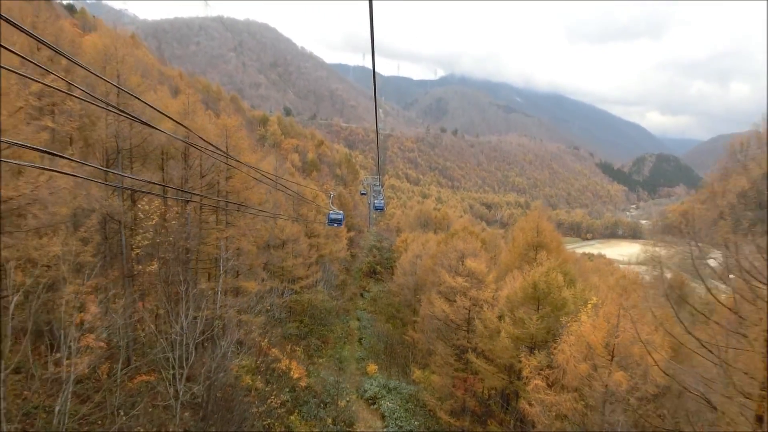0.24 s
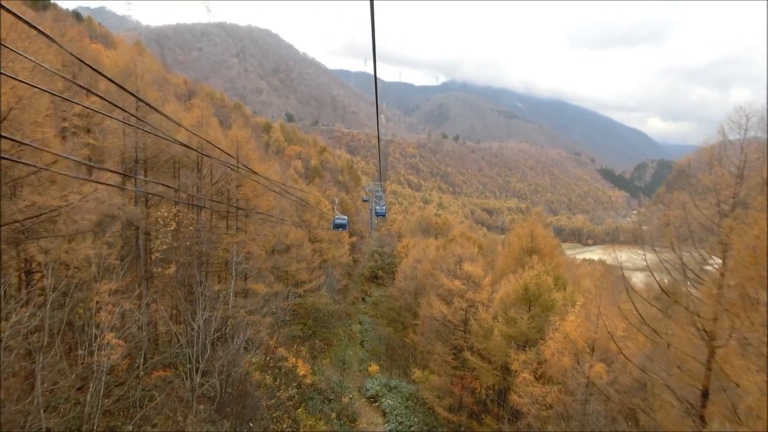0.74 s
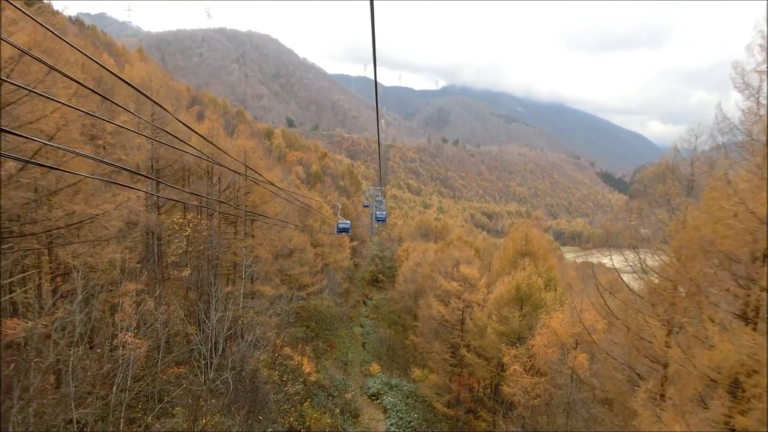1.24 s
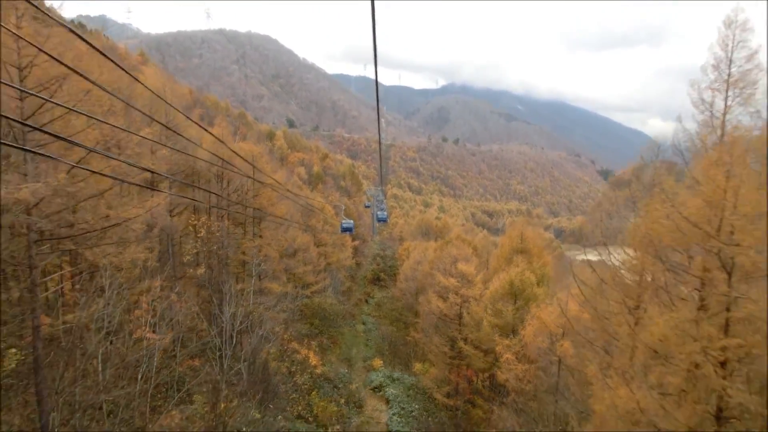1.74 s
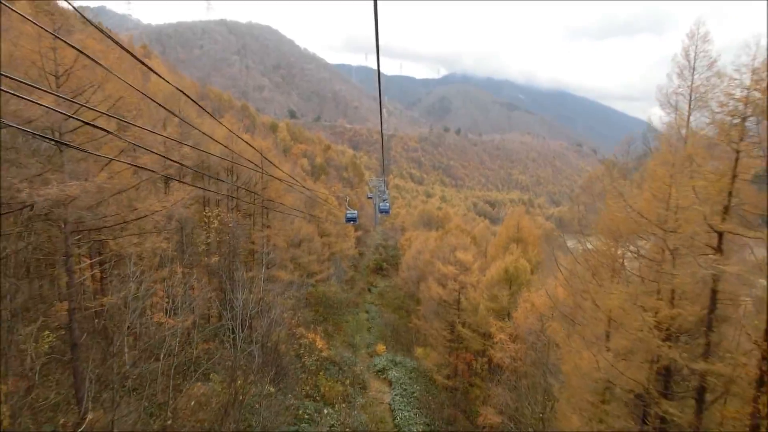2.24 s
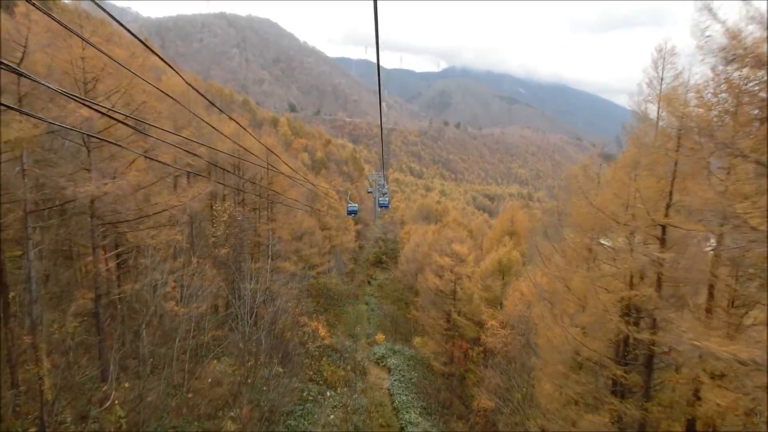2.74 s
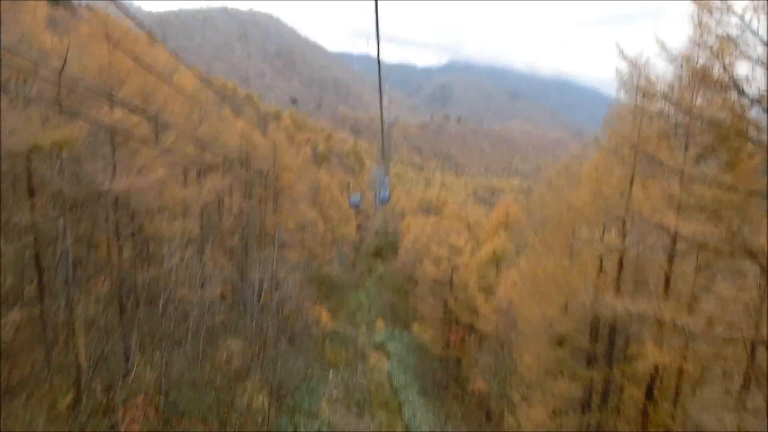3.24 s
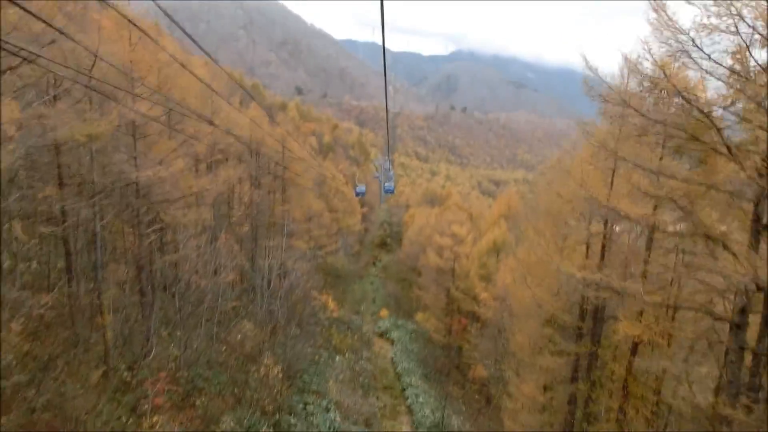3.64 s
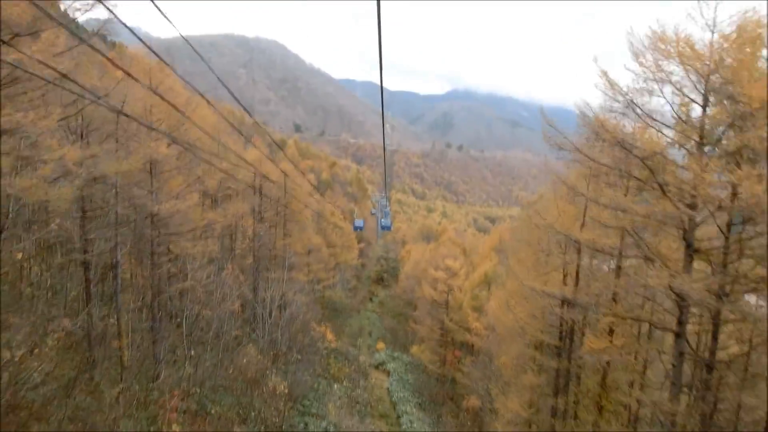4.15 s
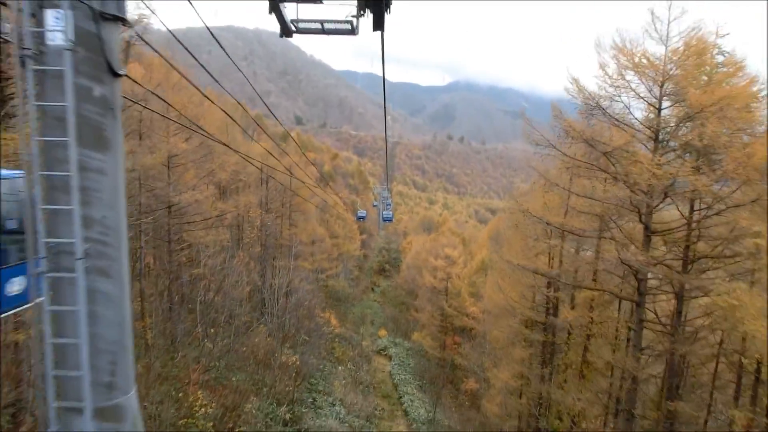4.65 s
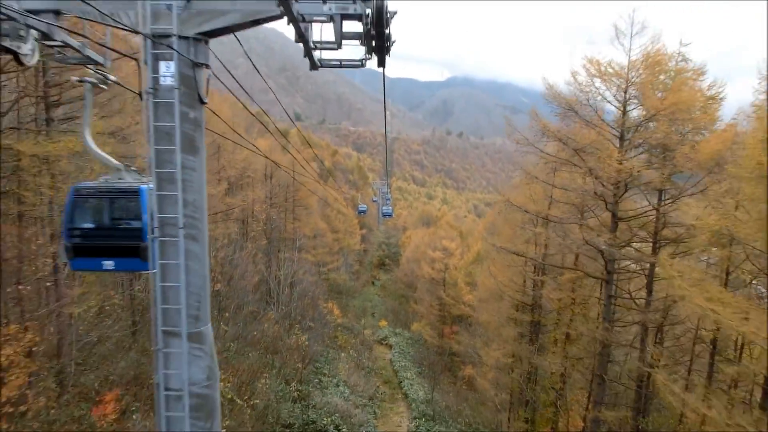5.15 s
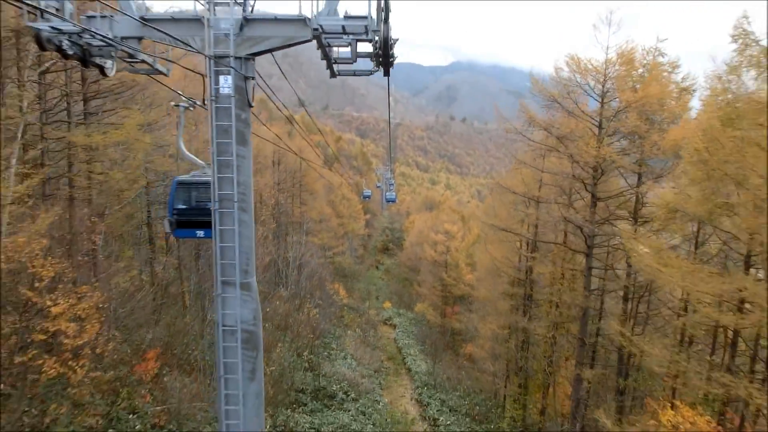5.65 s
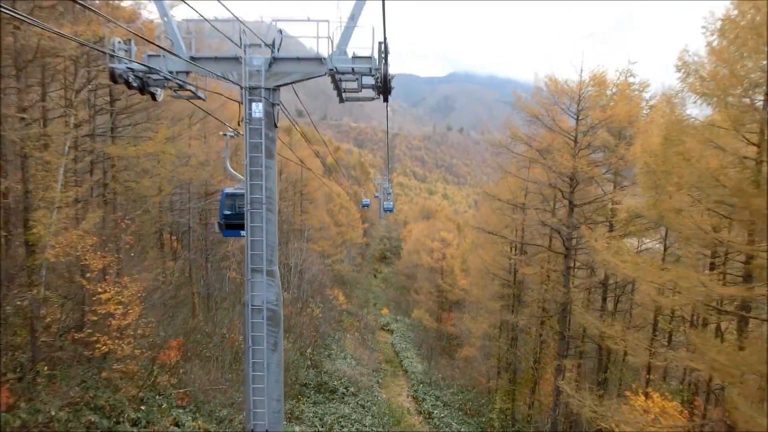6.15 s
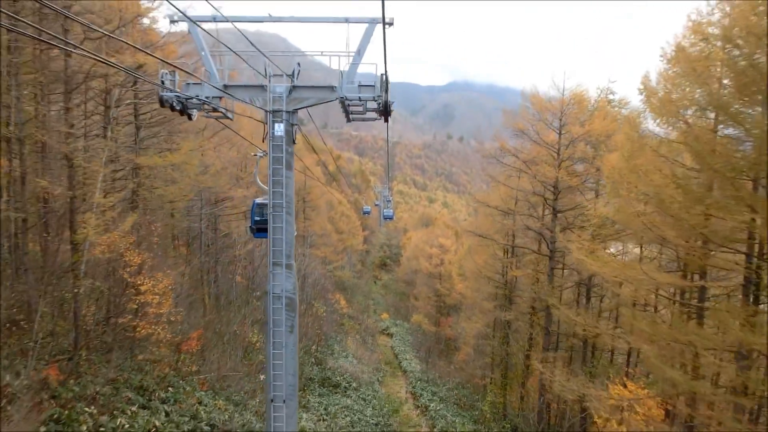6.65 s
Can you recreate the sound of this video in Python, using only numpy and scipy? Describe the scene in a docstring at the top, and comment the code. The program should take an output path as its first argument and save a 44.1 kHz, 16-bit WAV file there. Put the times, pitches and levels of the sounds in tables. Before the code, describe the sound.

Inside a gondola cabin above autumn woods, a soft low hum pulses several times a second under faint airflow. After about three seconds the cabin hits a tower's wheels: deep booming jolts, rough rattling and sharp metallic clacks overhead. A second, lighter and brighter run of clacks follows, then it eases to humming with slightly stronger air. Close stereo microphone within the cabin.

```python
"""Inside a moving gondola cabin: the haul rope's strands hum through the grip into the shell, as wavering tones.
At a tower the grip bumps over the sheave wheels: jolts swell the cabin's boom and frame rumble, and trains of
knocks and single bursts make loose metal rattle and clack overhead, while a bracket sings in fuzzy tones.
Behind them lie a soft rush of air in shaped noise, cloth brushing in grainy hiss, and a few small ticks."""
import sys
import numpy as np
from scipy import signal
from scipy.fft import rfft, irfft, next_fast_len
from scipy.io import wavfile
from scipy.ndimage import uniform_filter1d

SR = 44100
rng = np.random.default_rng(int(sys.argv[2]) if len(sys.argv) > 2 else 0)


def inscribe(sig):
    """Save sig as 16-bit PCM at rate SR to the path in sys.argv[1].

    A 1-D sig is mono; a 2-D sig holds one channel per row.
    Samples are clipped to [-1, 1] before scaling.
    """
    pcm = np.round(np.clip(np.atleast_2d(sig).T, -1, 1) * 32767)
    wavfile.write(sys.argv[1], SR, pcm.astype(np.int16))


def volts(x):
    """Linear amplitude factor 10**(x/20) for a level x in dB, scalar or array-like."""
    e = np.asarray(x, float) / 20
    return 10 ** e


N = 304012  # samples

# strands of the rope running over the wheels: t/s, strand rate f/Hz
STRAND_RATE = [(0, 82.36), (.8, 83.1), (1.5, 85.1), (2.1, 87.6), (2.9, 89.14), (3.6, 88.25), (4.4, 86.13),
               (5.2, 85.38), (6.0, 83.6), (6.89, 83.37)]
# the rope's lowest line: t/s, f/Hz, level/dB before the throb, throb depth (0-1)
HUM = [(0, 83.9, -32, 0.7), (.4, 84.7, -38.5, 0), (.65, 85.6, -34, 0), (.86, 83, -37.5, 0.3),
       (1.05, 83.5, -30.5, 0.56), (1.25, 87.1, -34.5, 0), (1.45, 85.93, -30.5, 0.64),
       (1.7, 90.1, -31, 0.01), (2.05, 91.57, -28, 0.6), (2.35, 92.37, -31.5, 0.29), (2.75, 91.5, -30, 0.63),
       (3.0, 92.7, -28.5, 0.6), (3.2, 91.5, -21, 0.3), (3.4, 83.85, -34, 0.9), (3.7, 88.16, -19.5, 0.3),
       (4.3, 88.6, -38, 0), (4.37, 85.9, -24, 0), (4.66, 85.2, -26, 0), (4.74, 84.7, -33, 0.6),
       (4.9, 84.4, -32, 0.89), (5.07, 85.4, -28.5, 0.37), (5.3, 85.15, -34, 0.6), (5.46, 86.2, -26.5, 0.61),
       (5.64, 86.05, -29, 0.5), (5.78, 85.24, -29.5, 0.55), (5.88, 83.7, -31.5, 0.52),
       (6.1, 82.6, -36.5, 0.6), (6.5, 83.25, -32.5, 0.5), (6.89, 82.6, -36.5, 0.5)]
# the drone throbs about 4.7 times a second: crest t/s, crest number
THROB_CRESTS = [(-.1, -1), (2.97, 13), (4.83, 22), (6.94, 32)]
# higher lines of the rope: name, multiple of the strand rate, wavering width f/Hz,
# level/dB against the hum, level/dB against the jolts
OVERTONES = [("third half", 1.5, 10, -32, -33), ("seventh half", 3.45, 10.6, -35, -29),
             ("second", 2.07, 9.4, -14.5, -11.5), ("third", 3, 7, -19.5, -20),
             ("fourth", 3.98, 8, -23.5, -24), ("fifth", 5, 24, -27.5, -23)]
# an overtone or the door swells for a while: name, middle t/s, length t/s, level/dB
SWELLS = [("fourth", 0.13, 0.53, -46.5), ("fourth", 0.94, 0.092, -46), ("third", 0.73, 1, -50.5),
          ("second", 0.9, 0.33, -45), ("third", 1.63, 0.14, -42), ("fourth", 1.71, 0.19, -45.5),
          ("second", 1.833, 0.52, -39), ("third", 2.45, 1.2, -41.5), ("fourth", 2.68, 0.29, -47.5),
          ("third", 3.51, 0.11, -25), ("third", 3.09, 0.058, -27), ("seventh half", 2.97, 0.08, -40),
          ("seventh half", 1.74, 0.96, -50), ("third half", 2.1, 0.71, -44),
          ("third half", 2.79, 0.19, -41), ("third half", 5.55, 0.3, -39.5), ("third half", 3.5, 0.1, -36),
          ("door", 4.9, 0.16, -40), ("fourth", 6.5, 0.093, -48), ("fourth", 5.9, 0.15, -53),
          ("door", 5.17, 0.21, -37.5), ("door", 5.37, 0.14, -40.5), ("door", 5.55, 0.086, -51),
          ("door", 5.78, 0.12, -40), ("fourth", 4.97, 0.21, -46), ("fourth", 5.2, 0.1, -42),
          ("fourth", 6.5, 0.2, -52), ("fourth", 6.15, 0.51, -47), ("third", 6.48, 0.21, -40.5)]
# jolts through the hanger: t/s, level/dB, sway level/dB against it, panel level/dB against it
JOLTS = [(0, -46.5, 13, -15), (2.15, -41.5, 2, 3), (2.93, -39, -22, 5), (3.06, -21, 1.5, -9),
         (3.16, -18, -17, -14), (3.27, -22, -5, -25), (3.4, -20, -5, -9), (3.52, -17.5, 1.5, -5.5),
         (3.63, -19, -2, -4.5), (3.74, -19.5, -11, -9), (3.83, -21.5, -2.5, -11), (3.94, -30, 2, -5.5),
         (4.1, -28.5, 0, -14), (4.23, -32, -8, -6), (4.35, -37, 0, -8), (4.53, -27.5, -14, -8.5),
         (5.07, -30, -3, -20), (5.27, -35.5, -4, -17), (5.43, -36, 4, 5), (5.52, -33, 2, -24),
         (5.64, -37, -11, -22), (5.95, -39.5, 8, -13), (6.2, -35.5, 3, -12), (6.42, -40, 10, -13),
         (6.72, -40.5, 4, -5)]
# rumble of the cabin frame: f/Hz, level/dB
FRAME_SPECTRUM = [(20, 0), (32, 3), (45, -8), (62, -5.5), (85, 4.5), (117, 3), (160, -0.5), (207, -4.5),
                  (290, -6), (380, -17.5), (550, -26), (900, -29), (1300, -52)]
# bouts of rattling at the wheels: start t/s, length t/s, heavy hanger level/dB, light fittings level/dB
RATTLE_BOUTS = [(2.934, 0.027, -57, -60), (3.058, 0.18, -30, -44), (3.144, 0.036, -27.5, -41),
                (3.223, 0.13, -30.5, -45), (3.419, 0.16, -27, -40), (3.533, 0.045, -22.5, -37.5),
                (3.65, 0.098, -28, -42), (3.807, 0.061, -42, -45), (3.86, 0.1, -34, -56),
                (4.084, 0.11, -28, -42), (4.203, 0.089, -43, -36), (4.343, 0.043, -34, -43),
                (4.43, 0.16, -38.5, -39), (4.603, 0.046, -36, -35.5), (4.729, 0.066, -40, -45.5),
                (4.847, 0.24, -48.5, -52), (5.292, 0.18, -46.5, -54)]
# rattle of the heavy hanger: f/Hz, level/dB
HANGER_SPECTRUM = [(250, 10), (400, 3.5), (700, 4), (1100, -0.5), (1350, -7.5), (1600, -3), (2200, -9.5),
                   (2600, -23), (4700, -38.5), (10800, -46), (15500, -51)]
# rattle of the light fittings: f/Hz, level/dB
FITTINGS_SPECTRUM = [(350, -33), (700, -34), (1000, 5.5), (1400, -6), (2000, -0.5), (3000, -3), (4600, -5),
                     (7000, -10), (10700, -23.5), (13000, -30), (15500, -42)]
# what the fittings ring with: f/Hz, width f/Hz, level/dB
FITTINGS_MODES = [(500.4, 16, 0.5), (695, 110, -33), (852, 11, -6), (930, 140, -2.5), (1130, 370, -10),
                  (1654, 47, -9), (1974, 22, -6), (2190, 190, -7), (2560, 130, -18), (2830, 120, -19),
                  (3060, 26, -19), (3910, 110, -32), (4400, 480, -10), (4900, 860, -8), (5900, 90, -14),
                  (7000, 400, -16), (11000, 2500, -7.5)]
# single clacks of metal: t/s, level/dB, strongest ring f/Hz, treble level/dB, length scale t/s
CLACKS = [(3.026, -21, 3830, -10, 0.0029), (3.0583, -21, 3310, -45, 0.0046),
          (3.061, -24, 2085, -35, 0.0071), (3.09, -35, 4800, 9, 0.0078), (3.102, -40, 990, -30, 0.0078),
          (3.117, -38, 698, -30, 0.0087), (3.155, -27, 4600, 2, 0.012), (3.1783, -13, 2400, -10, 0.0021),
          (3.181, -15, 805, -22, 0.0064), (3.1967, -15.5, 4600, 2, 0.0015), (3.217, -16, 6800, -3, 0.0012),
          (3.236, -25, 4900, 3, 0.0078), (3.239, -18, 672, -37, 0.0053), (3.24, -31, 2020, -27, 0.015),
          (3.248, -29, 950, -32, 0.005), (3.256, -28, 1650, -30, 0.0059), (3.2899, -26, 4680, 9, 0.01),
          (3.303, -28, 1600, -30, .007), (3.348, -29, 4760, -5, 0.0061), (3.392, -22.5, 1003, -36, 0.0058),
          (3.421, -20.5, 1820, -7, 0.0041), (3.443, -23.5, 2115, -9, 0.02), (3.446, -25, 700, -30, 0.014),
          (3.498, -28, 2050, -30, 0.015), (3.489, -29.5, 4900, 17, 0.028), (3.527, -29, 5900, 3, 0.0091),
          (3.562, -27.5, 3298, -9, 0.0044), (3.578, -22, 4370, -20, 0.006),
          (3.579, -14.5, 1410, -26, 0.0046), (3.593, -13.5, 1524, -35, 0.0057),
          (3.618, -38, 722, -35.5, 0.0068), (3.738, -20.5, 1400, -42, 0.0051),
          (3.745, -38, 950, -40, 0.0071), (3.791, -25.5, 1630, -40, 0.013), (3.805, -29.5, 2150, -30, .02),
          (3.8521, -28, 1700, -22, 0.008), (3.955, -30, 650, -30, 0.005), (4.106, -33, 910, -32, 0.0095),
          (4.126, -27, 490, -28, 0.0085), (4.147, -19.5, 833, -16, 0.012), (4.155, -25.5, 1950, -4, 0.04),
          (4.191, -22, 1950, -18, 0.014), (4.229, -15, 4285, -5, 0.0045), (4.233, -14, 2930, -9, 0.0061),
          (4.2449, -12.5, 1690, -14, 0.0048), (4.247, -15, 3860, -15, .004), (4.254, -19, 980, -6, 0.0079),
          (4.292, -28, 930, -30, 0.012), (4.294, -21.5, 1990, 0, 0.016), (4.346, -23.5, 493.6, -30, 0.0082),
          (4.37, -25, 497, -30, 0.018), (4.361, -22, 1940, 1, 0.022), (4.4115, -23, 1880, -3, 0.013),
          (4.4383, -19, 2560, -20, 0.015), (4.499, -28.5, 910, -10, 0.032), (4.552, -23.5, 2773, -8, 0.018),
          (4.612, -23.5, 2160, 0, 0.0096), (4.635, -22, 5824, 4, 0.011), (4.642, -27, 930, -30, 0.0094),
          (4.687, -34, 1900, 14, 0.012), (4.733, -28.5, 2560, -22, 0.011), (4.745, -29, 965, -25, 0.012),
          (4.765, -29, 800, -27, 0.012), (4.809, -38, 2300, -36, 0.015), (5.029, -34.5, 1028, -30, 0.014),
          (5.086, -36, 1104, -30, .01), (5.3, -35, 800, -16, .01), (5.435, -40, 799, -20, 0.01),
          (5.45, -35, 1020, -30, 0.0084)]
# a bracket sings while the second set of wheels shakes it: start t/s, length t/s, level/dB
BRACKET_BOUTS = [(4.12, .15, -38), (4.35, 0.072, -34.5), (4.44, 0.12, -36.5), (4.62, 0.028, -34),
                 (4.73, .04, -44)]
# tones of the bracket: f/Hz, width f/Hz, level/dB
BRACKET_TONES = [(500, 50, -8), (760, 70, -12), (930, 55, 0), (1150, 80, -12), (1700, 50, -13),
                 (1925, 55, -5), (2170, 60, -11), (2570, 55, -10), (2860, 50, -13)]
# rush of air: f/Hz, level/dB
AIR_SPECTRUM = [(200, -24), (330, -8), (430, -17), (560, -15.5), (900, -15), (1300, -20), (1800, -19.5),
                (2300, -21.5), (4500, -26.5), (6000, -28), (7500, -28), (10000, -29.5), (13000, -33.5),
                (15500, -31.5)]
# course of the rush: t/s, level/dB
AIR_LEVEL = [(0, -50.5), (1.8, -50.5), (2.6, -48.5), (3.3, -42), (4.6, -42.5), (5.1, -45.5), (5.9, -46),
             (6.89, -46)]
# broad band of wind at a window gap: t/s, level/dB
GAP_LEVEL = [(0, -65.5), (2.3, -67.5), (2.9, -59.5), (4.8, -67), (5.8, -68), (6.4, -57), (6.89, -61)]
# cloth brushing near the microphone: start t/s, end t/s, level/dB
CLOTH_STROKES = [(0.68, 1.099, -51), (2.147, 2.449, -58.5), (6.172, 6.379, -53)]
# hiss of the cloth: f/Hz, level/dB
CLOTH_SPECTRUM = [(2500, -43), (4500, -6.5), (7000, -11), (10500, -6), (13000, -9), (15500, -10.5)]
# small ticks in the cabin: t/s, level/dB, f/Hz
TICKS = [(.56, -49, 4000), (1.245, -46, 11800), (1.504, -51, 8970)]
# stereo image, likeness of left and right: f/Hz, likeness (0-1)
LIKENESS = [(60, 0.96), (640, 0.97), (1400, 1), (3100, 0.92), (5000, 0.78), (7000, 0.65), (10000, 0.37),
            (15000, 0.18)]
# stereo image, lead of left over right in what they share: f/Hz, phase/rad
LEFT_LEAD = [(60, 0), (5000, 0), (7500, .2), (10000, 1.0), (13000, 2.4), (15500, 2.6)]
# stereo image, left over right: f/Hz, level/dB
LEFT_OVER_RIGHT = [(60, 2.5), (500, 2), (1200, 2.5), (2500, 1), (5000, 2), (9000, 2), (12000, 2),
                   (15000, -1)]

FRAME_RING_S = 0.13  # time constant of the frame's dying away
BOUT_RISE_S = 0.027


def rope():
    """The lowest line drones and throbs, pulled about by the shell; higher multiples are thinner wavering lines."""
    strand_hz = columns(STRAND_RATE)[0]
    drone_hz, hum_db, depth = columns(HUM)
    throb = 1 + depth * np.cos(2 * np.pi * columns(THROB_CRESTS)[0])
    out = volts(hum_db) * throb * wavering(drone_hz, 8, steady=0.6)
    shaken = jolts(FRAME_RING_S, np.transpose(JOLTS)[1])
    for name, multiple, width, rest_db, jolt_db in OVERTONES:
        size = pooled(volts(hum_db + rest_db), volts(jolt_db) * shaken, swells(name))
        out = out + size * wavering(multiple * strand_hz, width, steady=0.58)
    # a door panel that the hum sets going now and then
    return out + swells("door") * wavering(265, 10.4, steady=0.39)


def swells(name):
    """Bell-shaped swells of one line, added by power."""
    t = np.arange(N) / SR
    return pooled(*(volts(db) * np.exp(-(2 * (t - middle) / length) ** 2)
                    for line, middle, length, db in SWELLS if line == name))


def cabin():
    """The cabin sways, its shell booms, a panel drums and the frame rumbles with the hum and the jolts."""
    hum_db = columns(HUM)[1]
    _, jolt_db, sway_db, panel_db = np.transpose(JOLTS)
    # levels in dB: the sway's own at rest, the others against the hum; first jolts() setting is ring time in s
    sway = pooled(volts(-40.5), jolts(0.14, jolt_db + sway_db))
    boom = pooled(volts(hum_db - 16.5), jolts(0.13, jolt_db))
    panel = pooled(volts(hum_db - 23.5), jolts(0.14, jolt_db + panel_db))
    frame = pooled(volts(hum_db - 7), jolts(FRAME_RING_S, jolt_db - 2))
    modes = sway * wavering(43, 18, steady=0.82)
    modes = modes + boom * wavering(120, 27, steady=0.46)
    modes = modes + panel * wavering(210, 20.4, steady=0.28)
    surges = volts(2.5 * drift(N, 3000))  # the rumble comes in uneven surges
    return modes + frame * coloured(surges * rng.standard_normal(N), FRAME_SPECTRUM)


def rattle():
    """Knocks set the metal ringing: coarse ones the hanger, dense ones the fittings."""
    start, length, hanger_db, fittings_db = np.transpose(RATTLE_BOUTS)
    coarse = gusts(150, fade_s=0.008, floor=0.8) * rng.standard_normal((2, N))
    dense = gusts(350, fade_s=0.005, floor=0.5) * rng.standard_normal((2, N))
    hanger = coloured(coarse, HANGER_SPECTRUM)
    light = evened(coloured(dense, FITTINGS_SPECTRUM) + volts(-3) * evened(fittings(dense)))
    hanger_size = bouts(zip(start, length, hanger_db), fade=0.092)
    light_size = bouts(zip(start, length, fittings_db), fade=0.083)
    return hanger_size * hanger + light_size * light


def clacks():
    """Each clack is a sudden burst: a broad crack and one strong ring of its own; the fittings ring after it."""
    size = 4096
    out, blows = np.zeros((2, N)), np.zeros((2, N))
    t = np.arange(size) / SR
    f = np.fft.rfftfreq(size, 1 / SR)
    for s, db, hz, treble_db, length in CLACKS:
        tilt = [(400, -13), (1200, -14), (2500, -12.5 + 0.23 * treble_db), (4200, -11.5 + 0.37 * treble_db),
                (6500, -11.5 + treble_db), (11000, -14 + treble_db), (13000, -16 + treble_db),
                (15500, -35 + treble_db)]  # f/Hz, level/dB
        noise = rng.standard_normal((2, size))
        attack = np.minimum(t / (0.13 * length), 1)
        decay = np.exp(-(t / (1.49 * length)) ** 2) + 0.1 * np.exp(-t / 0.1)
        first_contact = volts(db - 9) * np.exp(-t / 0.001)
        shape = volts(db - 10.5) * attack * decay + first_contact
        crack = evened(evened(irfft(rfft(noise) * volts(read(tilt, f)))) * shape)

        wobble = 0.03 * drift((2, size), 150, axis=-1)  # as a share of the ring's pitch
        cycles = np.cumsum(hz * (1 + wobble), axis=1) / SR + rng.random((2, 1))
        ring = evened(np.sin(2 * np.pi * cycles) * shape)
        burst = crack + volts(-4 - 0.2 * treble_db) * ring  # dull clacks ring purer
        burst *= np.linalg.norm(shape) / np.linalg.norm(burst, axis=1, keepdims=True)
        first = round(s * SR)
        out[:, first:first + size] += burst
        # the shortest clacks hardly move the metal
        blows[:, first:first + size] += noise * shape * min(length / 0.021, 1)
    return out + volts(-9) * fittings(blows)


def fittings(drive):
    """The loose metal rings on at its modes; the struck spot wanders, so each mode comes and goes."""
    spots = drift((N // 256 + 1, len(FITTINGS_MODES)), 7, axis=0)
    spots = volts(2 * np.repeat(spots, 256, axis=0)[:N].T)
    out = 0
    for (hz, width, db), spot in zip(FITTINGS_MODES, spots):
        evening = np.sqrt(SR / width / 3)  # makes up for narrow modes passing less noise
        out = out + volts(db) * resonate(drive * spot, hz, width) * evening
    return out


def bracket():
    """Fuzzy metal tones, each coming and going by itself, broken up by uneven shaking."""
    uneven = volts(3 * drift(N, 500))
    tones = 0
    for hz, width, db in BRACKET_TONES:
        tones = tones + volts(db) * volts(3 * drift(N, 500)) * wavering(hz, width, steady=0.25)
    return bouts(BRACKET_BOUTS, fade=0.037) * evened(uneven * tones)


def air():
    """Smooth noise rushes past the cabin in faint drifting patches, with wind at a window gap and a faint whine."""
    noise = rng.standard_normal((3, 2, N))
    rush = volts(columns(AIR_LEVEL)[0]) * coloured(noise[0], AIR_SPECTRUM)
    gap = volts(columns(GAP_LEVEL)[0]) * evened(resonate(noise[1], 7340, 1700))
    whine = volts(-66.5) * evened(resonate(noise[2], 1660, 110))  # faint band that sings in the rush
    _, t, z = signal.stft(rush + gap + whine, nperseg=512)
    patches = uniform_filter1d(rng.standard_normal(z.shape[1:]), 8, axis=0)  # across frequency
    patches = evened(uniform_filter1d(patches, 10, axis=1))  # along time
    flicker = drift(len(t), 6)  # the whole rush together
    return signal.istft(z * volts(patches + 0.15 * flicker), nperseg=512)[1][:, :N]


def cloth():
    """Grainy, uneven high hiss under each stroke of cloth, and a few short ticks as decaying sines."""
    t = np.arange(N) / SR
    grain = volts(1.3 * drift(N, 120) + 1.3 * drift(N, 1500))  # fine and coarse unevenness
    hiss = coloured(grain * rng.standard_normal((2, N)), CLOTH_SPECTRUM)
    strokes, ticks = np.zeros(N), np.zeros(N)
    for start, end, db in CLOTH_STROKES:
        strokes += volts(db) * np.clip(np.minimum((t - start) / 0.042, (end - t) / 0.088), 0, 1)
    for s, db, hz in TICKS:
        decay = (t > s) * np.exp(-abs(t - s) / 0.004)
        ticks += volts(db) * np.sin(2 * np.pi * hz * (t - s)) * decay
    return strokes * hiss + ticks


def evened(x):
    """Scales to rms 1."""
    return x / np.sqrt(np.mean(x ** 2) + 1e-20)


def drift(shape, span, axis=-1):
    """Slow random drift at rms 1: noise averaged over span points."""
    return evened(uniform_filter1d(rng.standard_normal(shape), span, axis=axis))


def read(points, hz):
    """Reads a spectrum on a log-frequency axis."""
    f, value = np.transpose(points)
    return np.interp(np.log(hz + 1), np.log(f + 1), value)


def columns(rows):
    """Every column of a curve table at every sample."""
    s, *values = np.transpose(rows)
    return [np.interp(np.arange(N) / SR, s, v) for v in values]


def coloured(x, spectrum):
    """Filters x by a spectrum in dB, at rms 1."""
    size = next_fast_len(N)
    gain = volts(read(spectrum, np.fft.rfftfreq(size, 1 / SR)))
    return evened(irfft(rfft(x, size) * gain, size)[..., :N])


def resonate(x, hz, width):
    """Shifts hz to zero, smooths twice, shifts back: a steep resonance."""
    turn = np.exp(2j * np.pi * np.cumsum(hz * np.ones(x.shape[-1])) / SR)
    r = np.exp(-np.pi * width / SR)
    return 2 * (turn * signal.lfilter([(1 - r) ** 2], [1, -2 * r, r * r], x / turn)).real


def wavering(hz, width, steady):
    """A tone whose pitch wanders within width and whose size is partly steady, partly chance."""
    r = np.exp(-np.pi * width / SR)
    a, b = rng.standard_normal((2, N))
    z = signal.lfilter([1], [1, -2 * r, r * r], a + 1j * b)
    size = abs(z) ** (1 - steady)
    carrier = np.exp(2j * np.pi * np.cumsum(hz * np.ones(N)) / SR)
    return evened((size * z / abs(z) * carrier).real)


def held(start, length, rise, fade):
    """Envelope: straight rise, hold, exponential fade."""
    t = np.arange(N) / SR - start
    return np.clip(t / rise, 0, 1) * np.exp(-np.maximum(t - length, 0) / fade)


def pooled(*sizes):
    """Unrelated shakes add by power."""
    return np.sqrt(sum(size ** 2 for size in sizes))


def jolts(ring, levels_db):
    """How hard a part is shaken by all jolts, each dying away over the ring time."""
    rise = 0.024  # s
    return pooled(*(volts(db) * held(row[0], rise, rise, ring) for row, db in zip(JOLTS, levels_db)))


def bouts(rows, fade):
    """How hard the metal is shaken through bouts of start, length and level."""
    return pooled(*(volts(db) * held(start, length, BOUT_RISE_S, fade) for start, length, db in rows))


def gusts(per_s, fade_s, floor):
    """Loudness of a train of knocks of uneven size over a steady floor."""
    sizes = volts(3 * np.minimum(rng.exponential(1, N), 3))
    knocks = (rng.random(N) < per_s / SR) * sizes
    fade = np.exp(-np.arange(2000) / (fade_s * SR))
    return np.sqrt(floor + evened(signal.oaconvolve(knocks, fade)[:N]) ** 2)


def scene():
    """Two close microphone ports: alike in the bass, ever more unlike towards the treble."""
    near, other = rattle() + clacks() + air() + cloth()
    near = near + rope() + cabin() + bracket()
    size = next_fast_len(N)
    hz = np.fft.rfftfreq(size, 1 / SR)
    same = np.clip(read(LIKENESS, hz), 0, 1)
    left = rfft(near, size)
    shared = same * left * np.exp(-1j * read(LEFT_LEAD, hz))
    right = shared + np.sqrt(1 - same ** 2) * rfft(other, size)
    half_db = read(LEFT_OVER_RIGHT, hz) / 2
    return irfft(np.array([left * volts(half_db), right * volts(-half_db)]), size)[:, :N]


def roll_off(x):
    """The treble ends steeply here."""
    return signal.sosfilt(signal.butter(12, 15710, fs=SR, output="sos"), x)


def record(dry):
    """The recorder cuts the lowest bass, saturates softly and cuts the top treble."""
    mix = signal.sosfilt(signal.butter(2, 30, "high", fs=SR, output="sos"), dry)
    mix = 0.75 * np.tanh(mix / 0.75)  # the loudest booms are rounded off
    low_pass = signal.firwin(511, 15450, window=("kaiser", 3), fs=SR)
    mix = signal.oaconvolve(mix, low_pass[None], "same")
    return roll_off(mix)


dry = scene()
out = record(dry)
inscribe(out)
```